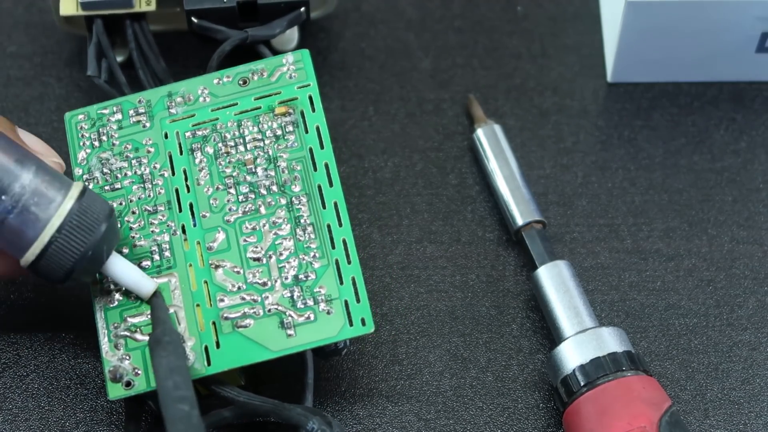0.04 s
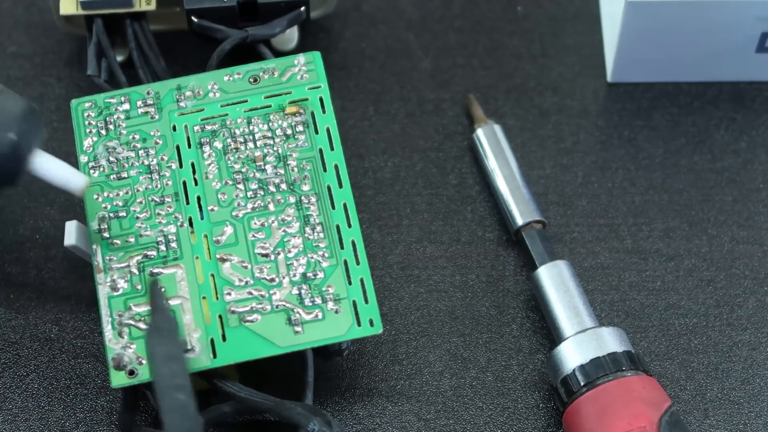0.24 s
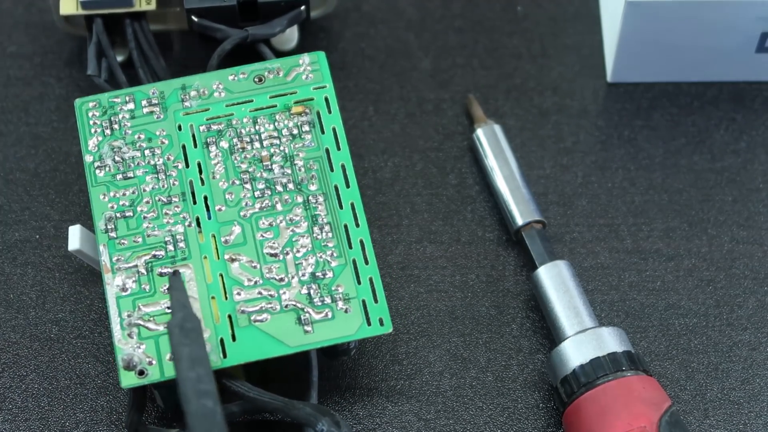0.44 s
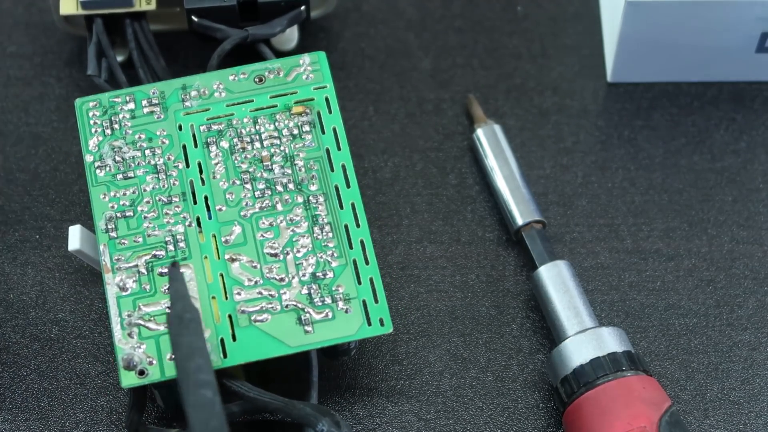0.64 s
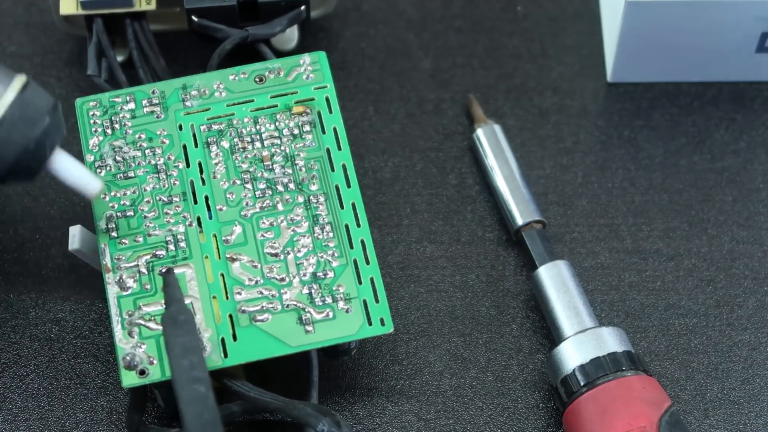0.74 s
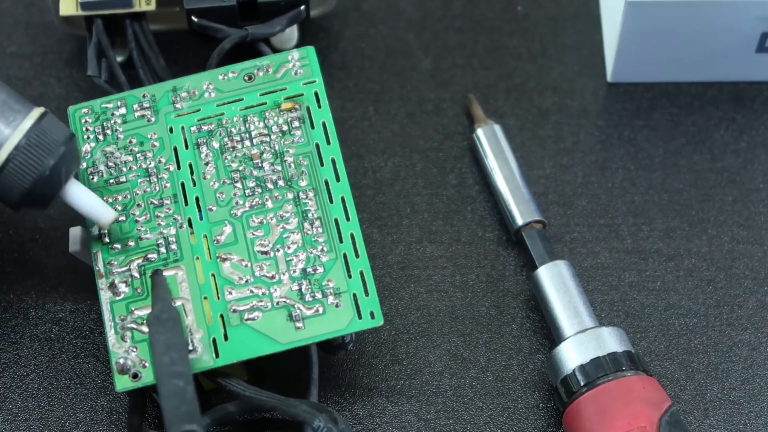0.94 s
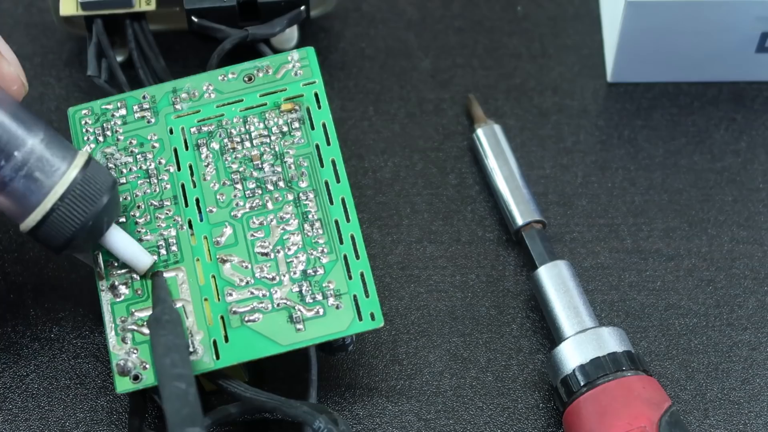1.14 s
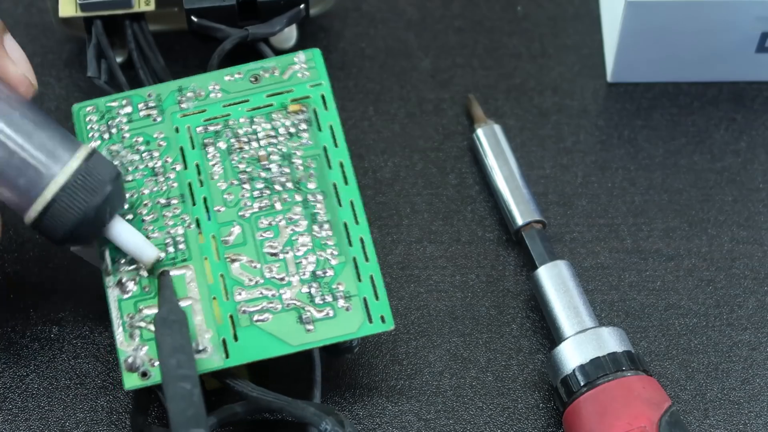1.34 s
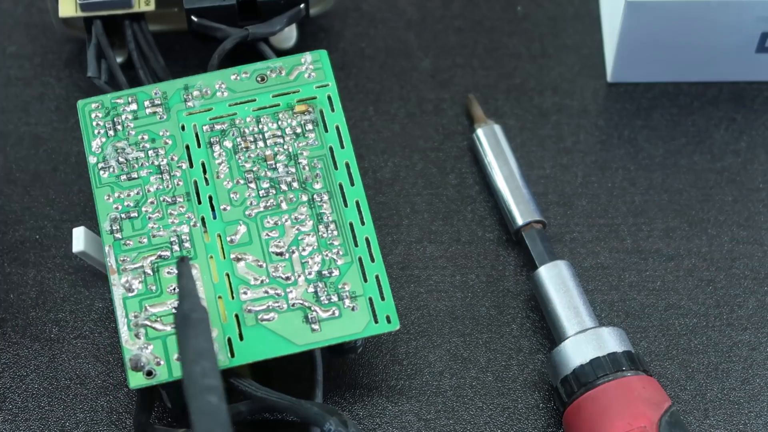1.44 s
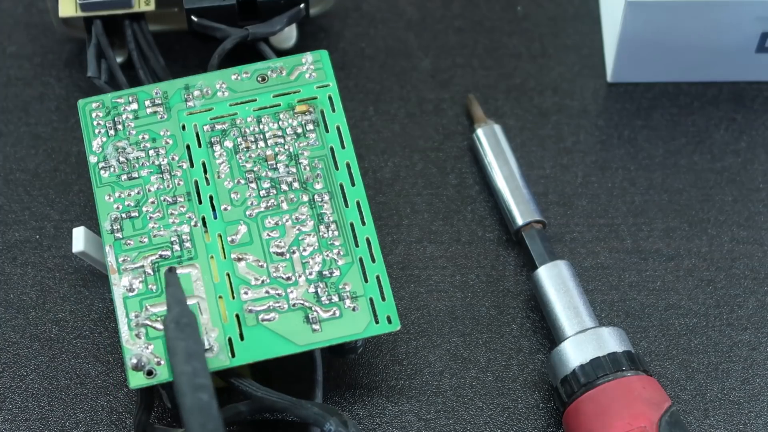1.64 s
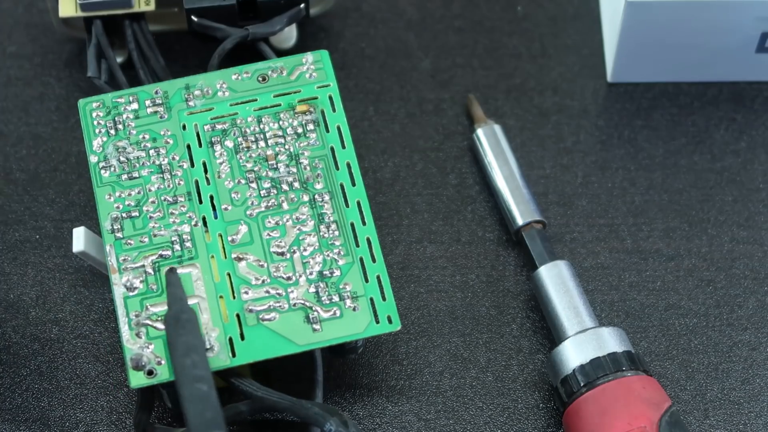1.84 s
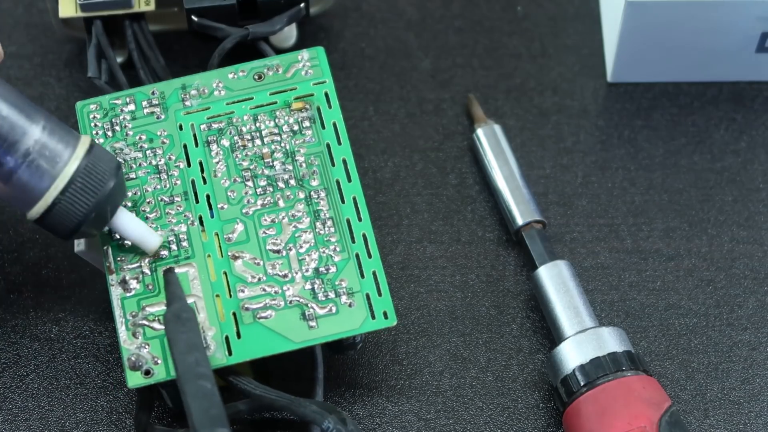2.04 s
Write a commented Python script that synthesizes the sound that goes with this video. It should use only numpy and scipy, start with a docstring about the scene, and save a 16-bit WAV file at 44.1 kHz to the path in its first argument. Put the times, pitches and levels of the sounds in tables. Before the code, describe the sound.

Close to the microphone, a solder sucker snaps sharply and its plunger is pushed back with small clicks and knocks. It snaps and is reset once more, while fans hum and rush softly in a small workroom.

```python
"""At a workbench in a small room, a spring-loaded desoldering pump is fired twice at close range.
The catch releases the spring; the piston strikes its stop and rebounds, and the impact excites
free vibration of barrel and spring. Re-cocking gives a short frictional slide, a bright catch
click and a few plastic knocks. Fans hum and rush in the background, over a faint low rumble."""
import sys
import numpy as np
from scipy import signal
from scipy.fft import rfft, irfft
from scipy.io import wavfile
from scipy.ndimage import uniform_filter1d

SR = 44100
rng = np.random.default_rng(int(sys.argv[2]) if len(sys.argv) > 2 else 0)


def master_out(mix):
    """Clip the mix to full scale and print it as 16-bit PCM to the path in sys.argv[1]."""
    frames = np.transpose(np.atleast_2d(mix))
    ceiling = np.clip(frames, -1, 1)
    pcm = np.round(ceiling * 32767).astype(np.int16)
    wavfile.write(sys.argv[1], SR, pcm)


N = 92610

# Events; levels are relative within each source.
# firings: release t/s, level/dB; impact t/s, level/dB; rebound t/s, level/dB; ring level/dB
FIRINGS = [(0.2367, 3, .2371, 5.5, .2388, 0, 2), (1.3913, -2, 1.3923, 7.5, 1.3937, -8, 5)]
# the catch engages: t/s, level/dB
LATCHINGS = [(.5224, -5.5), (1.6888, -4.5)]
# the plunger strikes the barrel: t/s, knock level/dB, grit level/dB, frequency ratio
PLUNGER_KNOCKS = [(.5674, -2.5, -15.5, 0.99), (0.6062, -9.5, -24, 0.93), (0.6267, -2, -14.5, 0.99),
                  (1.707, -18, -30, 0.98), (1.7279, -2.5, -16, 1), (1.7638, -14.5, -26, 0.91),
                  (1.7956, -1, -12, 1), (1.8363, -5.5, -22, 1)]
# light handling contacts: t/s, level/dB
HANDLING_TICKS = [(.4601, -4.5), (.6815, -6), (1.329, -16), (1.352, -13), (1.368, -17), (1.8765, -11.5)]
# the piston slides in the barrel: start t/s, duration/s, level/dB
PISTON_SLIDES = [(0.493, 0.031, -41.5), (0.613, 0.026, -45), (1.647, 0.053, -44.5), (1.791, 0.0064, -38)]
# the hand meets the bench: t/s, level/dB
HAND_BUMPS = [(.641, -9.5)]

# spectral envelopes of the contacts and the spring's rattle: f/Hz, relative level/dB
PISTON_SPECTRUM = [(60, -32), (200, -21), (450, -6.5), (900, -2.5), (1600, 1.5), (2200, 0.5), (3200, 7.5),
                   (4400, 4), (5400, 2), (7000, 4), (9500, -9), (12000, -27), (14300, 3.5), (16500, -22)]
CATCH_SPECTRUM = [(200, -40), (3000, -24), (8000, -21), (10000, -10.5), (11300, -5), (12100, -4),
                  (13100, 4), (14400, -14), (15500, -3), (17000, -12)]
KNOCK_SPECTRUM = [(80, -28), (350, -14), (800, -8), (2650, -6.5), (3080, -10.5), (3500, -1.5), (4000, 5.5),
                  (4500, -6.5), (5700, -10.5), (7000, -21.5), (16000, -34)]
GRIT_SPECTRUM = [(200, -35), (3000, -17), (6000, -7), (7700, -7), (8800, -13), (10500, -4.5), (12000, 0.5),
                 (13800, 2.5), (14800, 0), (16000, -15)]
TICK_SPECTRUM = [(200, -3), (4300, -7), (5700, -2.5), (9000, -9), (12500, -4), (16000, -9.5)]
SLIDE_SPECTRUM = [(200, -11), (1500, -7), (4000, -5.5), (6000, -8), (8000, -7.5), (12000, -9), (16000, -15)]
BUMP_SPECTRUM = [(80, -26), (280, -10), (400, -0.5), (650, -5), (850, -1.5), (1300, -14), (4000, -25),
                 (16000, -60)]
RATTLE_SPECTRUM = [(60, -39), (170, -8), (290, -1.5), (500, -1), (1100, -1), (1700, 3.5), (2800, 0),
                   (4500, -2.5), (6500, 2), (9000, -1.5), (13500, -4.5), (16500, -32)]
# normal modes of the barrel: f/Hz, relative level/dB, T60/s
BARREL_MODES = [(515, -6, .085), (728, -1, .09), (890, -6, .08), (1860, -2, .075), (2028, -2, .08),
                (2580, -4, .08), (2703, -4, .1), (3511, 0, .08), (4225, -2, .075), (4612, 1, .075),
                (4782, -2, .08), (5925, -2, .1), (6109, -1, .09), (6925, -1, .1)]
# decay times of the spring and of the room: f/Hz, T60/s
SPRING_T60 = [(300, 0.1), (1500, 0.087), (5000, 0.11), (14000, .075)]
REVERB_T60 = [(200, 0.16), (1000, 0.093), (4000, .11), (14000, 0.1)]
# stereo difference against the common part, for rattle and reflections, and for air: f/Hz, level/dB
DIFFUSE_WIDTH = [(200, -54), (900, -53), (3000, -31), (4500, -14), (9000, -15), (15000, -3)]
AIR_WIDTH = [(120, -50), (240, -46), (480, -28.5), (950, -24.5), (1200, -11.5), (2500, -10.5), (7500, -8),
             (15000, -1.5)]

# spectral envelopes of the background noises: f/Hz, relative level/dB
AIR_SPECTRUM = [(15, -78), (25, -51), (43, -56), (66, -28), (145, -15), (206, -15.5), (223, -2), (249, -13),
                (344, -17.5), (516, -10.5), (695, -9), (775, -10), (936, -12), (1020, -7), (1160, -17.5),
                (2050, -14.5), (2550, -21), (5570, -24), (16000, -37.5)]
HISS_SPECTRUM = [(200, -42), (4500, -36), (5500, 3), (6000, -3), (6700, -2.5), (7600, -16), (16000, -33)]
RUMBLE_SPECTRUM = [(20, -40), (60, -10), (95, -9.5), (130, 6), (165, -6.5), (200, 5.5), (260, -9),
                   (500, -59), (2000, -70)]
# weaker lines of the hum: f/Hz, level/dB, rms wander/Hz
HUM_LINES = [(300, -68.5, 2.3), (452, -73.5, 6.3), (484.6, -64.5, 4.74), (525, -58, 11.6), (654, -56, 9.68),
             (749.6, -55, 6.97), (1255, -59.5, 7.84)]
# run-up of the second fan: t/s, blade-passing f/Hz, level/dB
FAN_RUN_UP = [(0, 231.4, -82), (0.219, 222.5, -53), (.29, 216, -45), (.38, 225, -53), (.47, 225.4, -45),
              (.56, 259, -50.5), (1.2, 260.6, -51.5), (2.1, 262.8, -53.5)]
# its harmonics: order, relative level/dB, rms wander/Hz, rms flutter/dB
FAN_HARMONICS = [(1, -1, 0.89, 0), (2, -2.5, 12.1, 4), (3, -7, 12.9, 3.5)]
# envelope of the rumble: t/s, level/dB
RUMBLE_ENVELOPE = [(0, -55), (.06, -55.5), (.16, -70), (0.301, -73), (0.402, -60), (.495, -61), (.535, -66),
                   (1.219, -76), (1.32, -60), (1.44, -61.5), (1.82, -70), (1.91, -57), (2.1, -78)]


def shots(piston_db=10.5, chatter_db=2):
    """Impact excitation: the released piston hits its stop, rebounds and chatters; the pump rings."""
    out = np.zeros((2, N))
    for release_s, release_db, impact_s, impact_db, rebound_s, rebound_db, ring_db in FIRINGS:
        add(out, release_s, amp(release_db) * catch())
        add(out, impact_s, amp(piston_db + impact_db) * click(PISTON_SPECTRUM))
        add(out, rebound_s, amp(piston_db + rebound_db) * click(PISTON_SPECTRUM, pitch=1.08))
        add(out, rebound_s, amp(chatter_db + ring_db) * scuff(PISTON_SPECTRUM, decay_s=0.0019))
        add(out, impact_s, amp(ring_db) * ringing())
    return out


def ringing(rise_s=0.0015):
    """Damped free vibration: discrete modes of the barrel and a dense, noise-like rattle of the spring."""
    t = np.arange(SR // 4) / SR
    barrel = sum(amp(db - 60 * t / t60) * np.sin(2 * np.pi * (hz * t + rng.random()))
                 for hz, db, t60 in BARREL_MODES)
    noise = tint(rng.standard_normal((2, len(t))), RATTLE_SPECTRUM)
    spring = spread(die_away(noise, SPRING_T60)[:, :len(t)], DIFFUSE_WIDTH)
    return (amp(-27.5) * barrel + amp(4.5) * spring) * np.minimum(t / rise_s, 1)


def catch():
    """A small, stiff body resonates high: the steel catch clicks brightly, a little to the left."""
    return pan(amp(2.5) * click(CATCH_SPECTRUM), left_db=3.0)


def cocking():
    """Friction and light impacts: the piston slides, the catch engages, the loose plunger knocks."""
    out = np.zeros((2, N))
    for s, duration_s, db in PISTON_SLIDES:
        add(out, s, amp(db) * slide(duration_s))
    for s, db in LATCHINGS:
        add(out, s, amp(db) * catch())
    for s, knock_db, grit_db, pitch in PLUNGER_KNOCKS:
        add(out, s, amp(knock_db - 2.5) * click(KNOCK_SPECTRUM, pitch))
        tick = scuff(GRIT_SPECTRUM, decay_s=0.0005)
        scrape = amp(-2) * scuff(GRIT_SPECTRUM, decay_s=0.012)
        add(out, s, pan(amp(grit_db) * (tick + scrape), left_db=4.0))
    for s, db in HANDLING_TICKS:
        add(out, s, amp(db - 12) * scuff(TICK_SPECTRUM, decay_s=0.0012))
    return out


def slide(duration_s, grains_per_s=8000):
    """Sliding friction: random micro-impacts of uneven strength under a half-sine envelope."""
    envelope = np.sin(np.linspace(0, np.pi, round(duration_s * SR)))
    strengths = rng.standard_normal(N) * amp(3.2 * np.minimum(rng.exponential(1, N), 4))
    grains = strengths * (rng.random(N) < grains_per_s / SR)
    return envelope * tint(grains, SLIDE_SPECTRUM)[:len(envelope)]


def click(spectrum, pitch=1, size=2048):
    """An ideal impact: the minimum-phase impulse response of a spectrum, at unit energy."""
    hz = abs(np.fft.fftfreq(size, 1 / SR))
    log_gain = np.log(amp(value_at(spectrum, hz / pitch)))
    response = np.exp(np.conj(signal.hilbert(log_gain)))
    impulse = np.fft.ifft(response).real[:size // 2]
    return impulse / np.linalg.norm(impulse)


def scuff(spectrum, decay_s):
    """A rough contact: a decaying random force drives the impulse response, at unit energy."""
    t = np.arange(SR // 16) / SR
    force = rng.standard_normal(len(t)) * np.exp(-t / decay_s)
    burst = signal.fftconvolve(force, click(spectrum))
    return burst / np.linalg.norm(burst)


def hand_bump(swell_s=0.0073):
    """A soft contact builds slowly and excites little treble: the hand thuds on the bench."""
    out, t = np.zeros(N), np.arange(SR // 8) / SR
    for s, db in HAND_BUMPS:
        thud = tint(rng.standard_normal(len(t)), BUMP_SPECTRUM) * t * np.exp(-t / swell_s)
        add(out, s, amp(db) * thud / np.linalg.norm(thud))
    return out


def room(x, delay_s=0.002):
    """Reverberation: convolution with short, dense reflections from the bench and nearby walls."""
    tail = spread(die_away(rng.standard_normal((2, SR // 4)), REVERB_T60), DIFFUSE_WIDTH)
    out = np.zeros((2, N))
    add(out, delay_s, signal.fftconvolve(x, tail, axes=1))
    return out


def fans():
    """Broadband flow noise and the tones of rotation: air, hiss, steady hum and whine, a second fan."""
    air = spread(tint(rng.standard_normal((2, N)), AIR_SPECTRUM), AIR_WIDTH)
    air *= amp(-46 + 0.2 * drift(rate_hz=36))
    hum = amp(-50) * tone(hz=241.6, wander_hz=1.0, flutter_db=2.0)
    whine = amp(-51) * tone(hz=999.3, wander_hz=3.03, flutter_db=0.84)
    hum += sum(amp(db) * tone(hz, wander, flutter_db=2.5) for hz, db, wander in HUM_LINES)
    second_fan = accelerating_fan()
    hiss = amp(-60) * tint(rng.standard_normal(N), HISS_SPECTRUM)
    return air + hiss + hum + whine + second_fan


def accelerating_fan(brighten_db_per_hz=0.43):
    """Harmonics of the blade-passing frequency follow the speed; the upper ones strengthen with it."""
    t = np.arange(N) / SR
    times, rates, levels = np.transpose(FAN_RUN_UP)
    blade_hz, level_db = np.interp(t, times, rates), np.interp(t, times, levels)
    upper_db = brighten_db_per_hz * (blade_hz - blade_hz.max())
    return sum(amp(level_db + db + upper_db * (order > 1)) * tone(order * blade_hz, wander, flutter)
               for order, db, wander, flutter in FAN_HARMONICS)


def rumble():
    """Amplitude-modulated low-frequency noise: a faint rumble that comes and goes."""
    level_db = np.interp(np.arange(N) / SR, *np.transpose(RUMBLE_ENVELOPE))
    return amp(level_db) * tint(rng.standard_normal(N), RUMBLE_SPECTRUM)


def tone(hz, wander_hz, flutter_db):
    """Random frequency and amplitude modulation broaden a spectral line; unit rms."""
    cycles = np.cumsum(hz + wander_hz * drift(rate_hz=15.35)) / SR + rng.random()
    return unit_rms(np.sin(2 * np.pi * cycles) * amp(flutter_db * drift(rate_hz=16)))


def drift(rate_hz):
    """Low-pass filtered noise: a slow random fluctuation of about unit rms."""
    low_pass = np.exp(-(np.fft.rfftfreq(2 * N, 1 / SR) / rate_hz) ** 2)
    return unit_rms(irfft(rfft(rng.standard_normal(2 * N)) * low_pass))[:N]


def die_away(x, t60_table, size=128):
    """Frequency-dependent damping: each band falls 60 dB in its own T60; unit energy."""
    hz, t, bands = signal.stft(x, SR, nperseg=size)
    decay = amp(-60 * t / value_at(t60_table, hz)[:, None])
    damped = signal.istft(bands * decay, SR, nperseg=size)[1]
    return damped / np.linalg.norm(damped, axis=-1, keepdims=True)


def spread(pair, width):
    """Mid-side stereo: the difference grows towards the treble and decorrelates left and right."""
    mid, side = pair[0], filtered(pair[1], width)
    return mid + np.array([side, -side])


def pan(x, left_db):
    """A level difference between the channels shifts the source to one side."""
    return x * amp([[left_db / 2], [-left_db / 2]])


def tint(x, spectrum):
    """Spectral shaping of noise, at unit rms."""
    return unit_rms(filtered(x, spectrum))


def filtered(x, gains):
    """Zero-phase filtering by a table of gains."""
    size = x.shape[-1]
    return irfft(rfft(x) * amp(value_at(gains, np.fft.rfftfreq(size, 1 / SR))), size)


def value_at(table, hz):
    """Interpolation on a logarithmic frequency axis."""
    f, value = np.transpose(table)
    return np.interp(np.log(hz + 1), np.log(f + 1), value)


def amp(db):
    """Amplitude ratio of a level in decibels."""
    return 10 ** (np.asarray(db) / 20)


def unit_rms(x):
    """Normalisation to an rms of 1."""
    return x / np.sqrt(np.mean(x ** 2) + 1e-20)


def add(mix, s, sound):
    """Superposition of a sound on the mix, starting at time s."""
    part = mix[..., max(round(s * SR), 0):][..., :sound.shape[-1]]
    part += sound[..., :part.shape[-1]]


def scene():
    """Superposition of the pump's direct sound, its reflections and the background."""
    fired, cocked = shots(), cocking()
    reflections = amp(-16) * room(fired) + amp(-6.5) * room(cocked)
    return fired + cocked + reflections + hand_bump() + fans() + rumble()


def record(dry, threshold_db=-14, reduction_share=0.57, recovery_db_per_s=94, ceiling=0.68):
    """Compression dips the gain after each shot; saturation rounds the peaks; filters limit the band."""
    power = abs(uniform_filter1d((dry ** 2).mean(0), size=88))  # 2 ms average
    power_db = 10 * np.log10(power + 1e-12)
    recovery_db = np.arange(N) * recovery_db_per_s / SR
    held_db = np.maximum.accumulate(power_db + recovery_db) - recovery_db  # peaks fall back steadily
    excess_db = np.maximum(held_db - threshold_db, 0)
    ducked = dry / amp(reduction_share * uniform_filter1d(excess_db, size=44))
    rounded = ceiling * np.tanh(ducked / ceiling)
    low_cut = signal.butter(2, 55, "high", fs=SR, output="sos")
    high_cut = signal.firwin(161, 16300, window=("kaiser", 9), fs=SR)
    return signal.oaconvolve(signal.sosfilt(low_cut, rounded), high_cut[None], "same", axes=1)


dry = scene()
out = record(dry)
master_out(out)
```